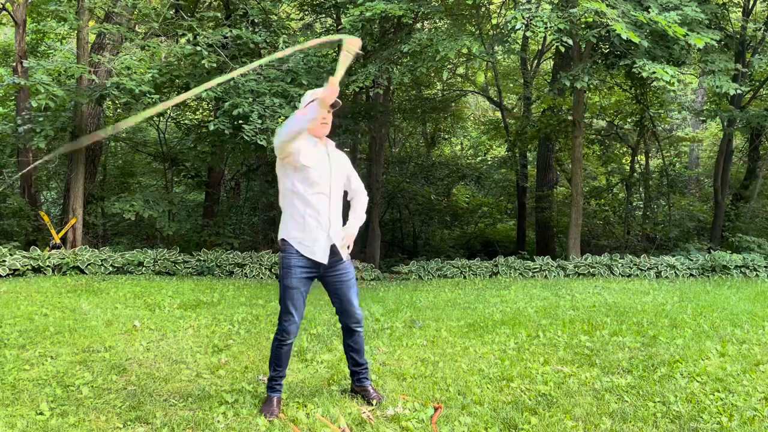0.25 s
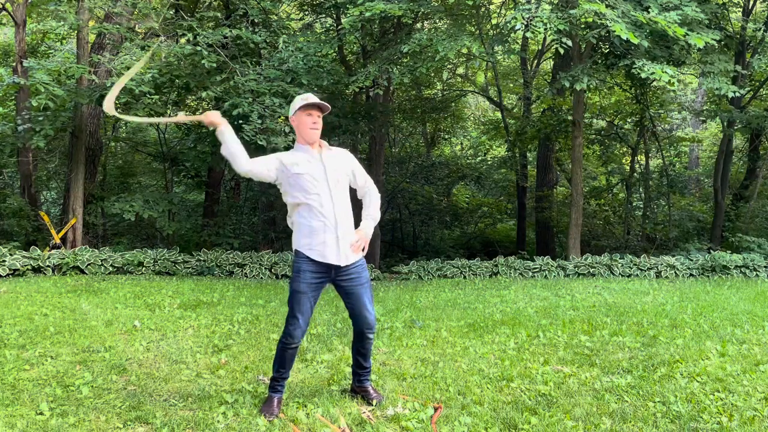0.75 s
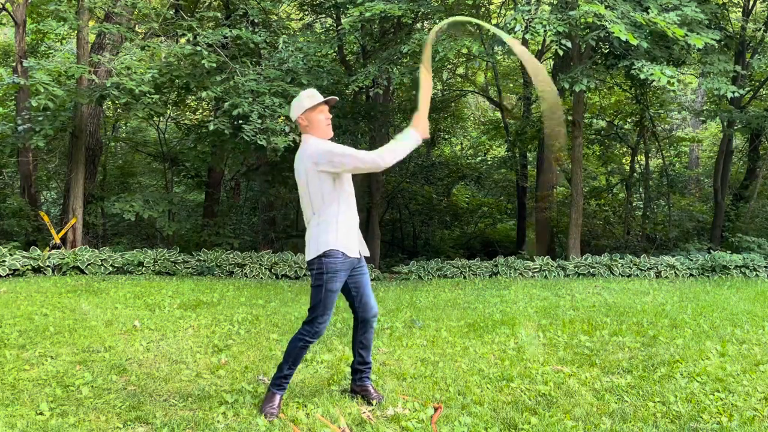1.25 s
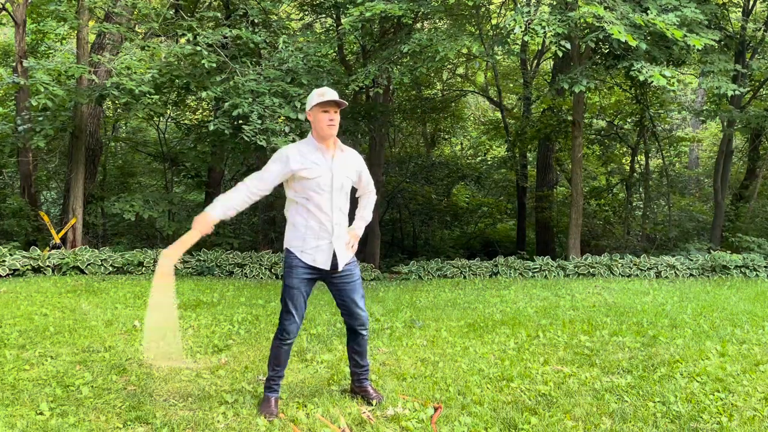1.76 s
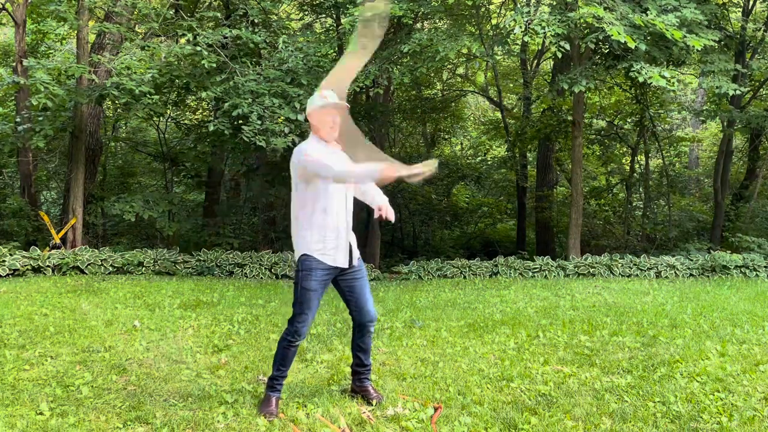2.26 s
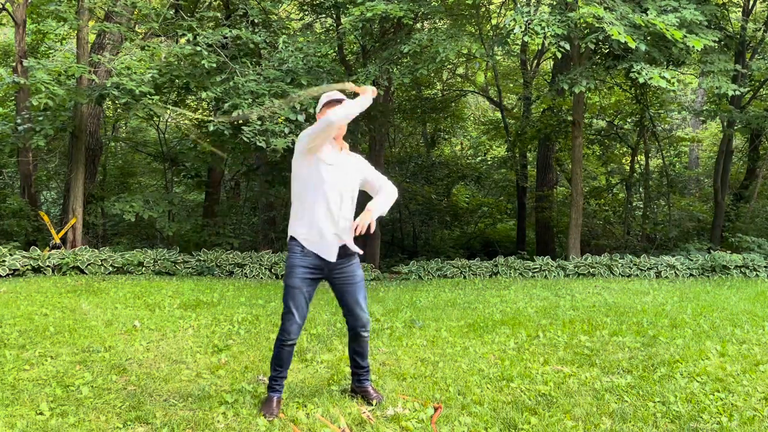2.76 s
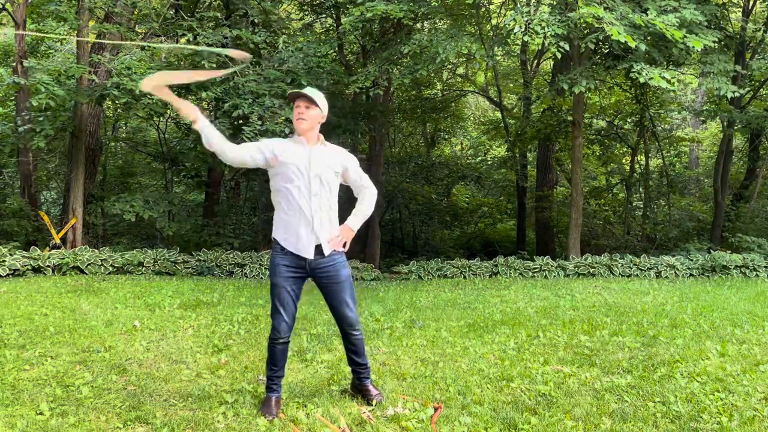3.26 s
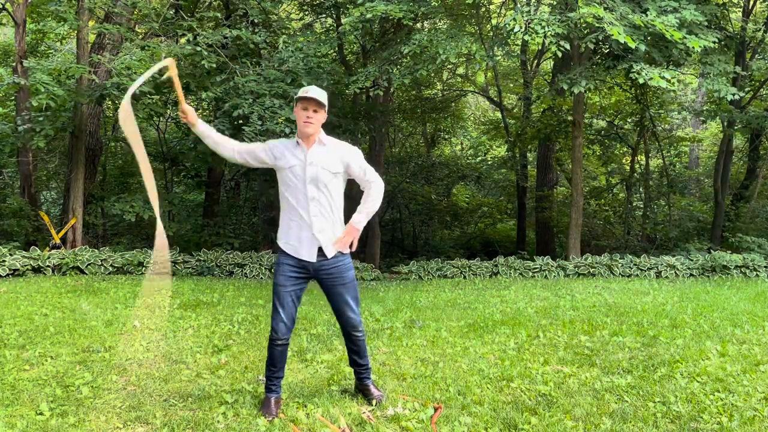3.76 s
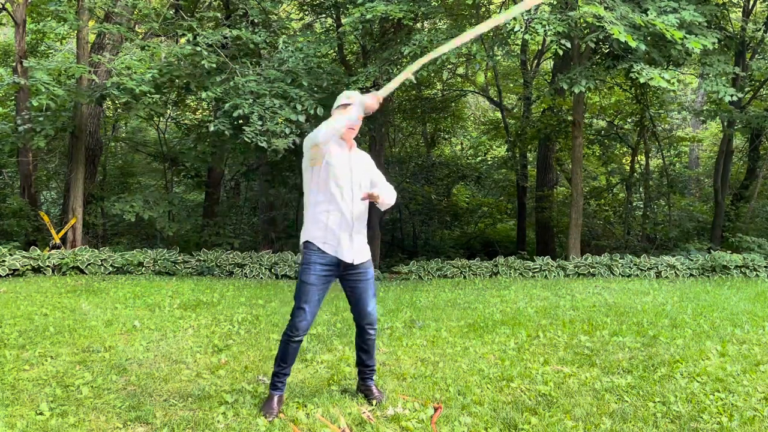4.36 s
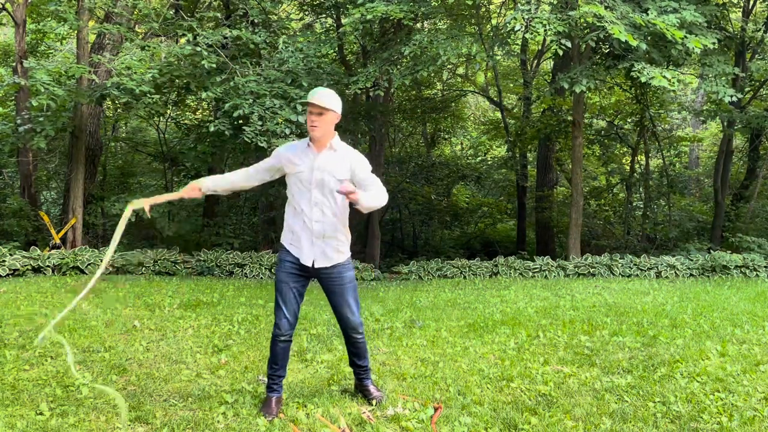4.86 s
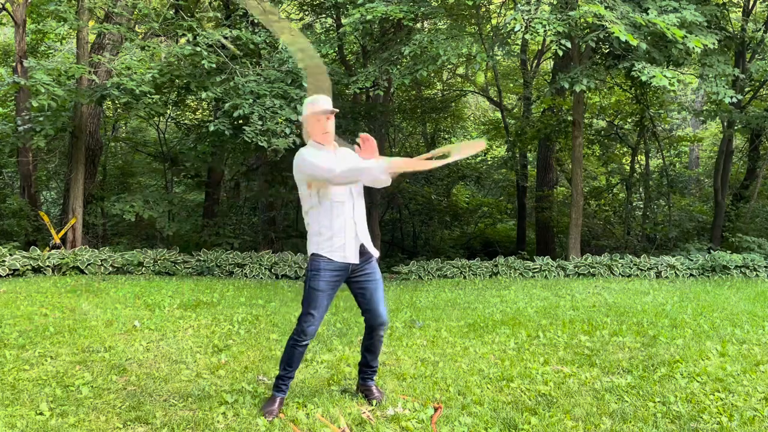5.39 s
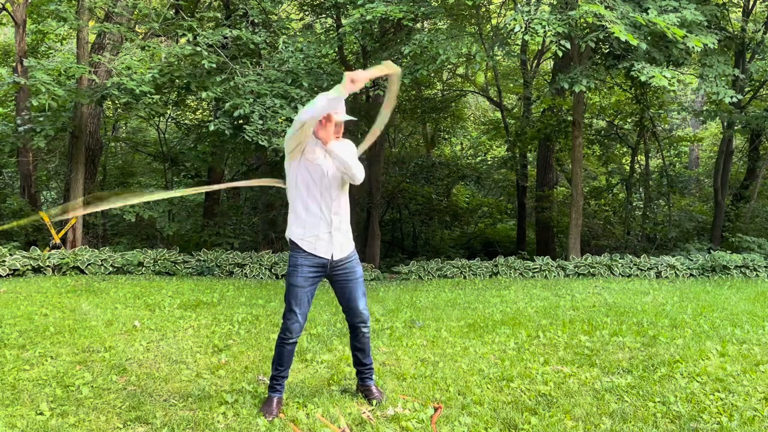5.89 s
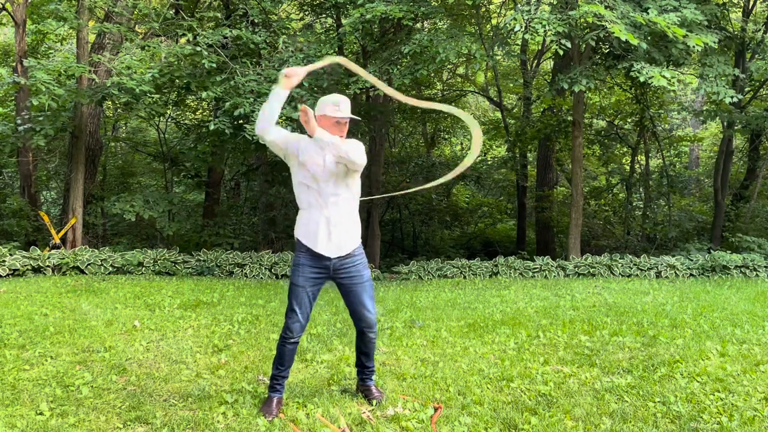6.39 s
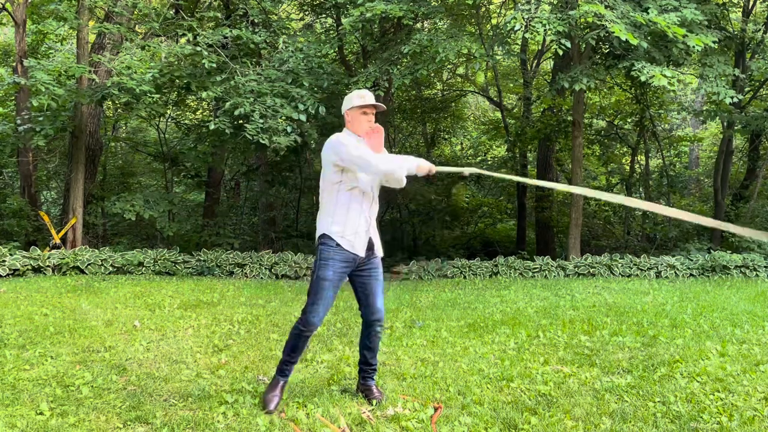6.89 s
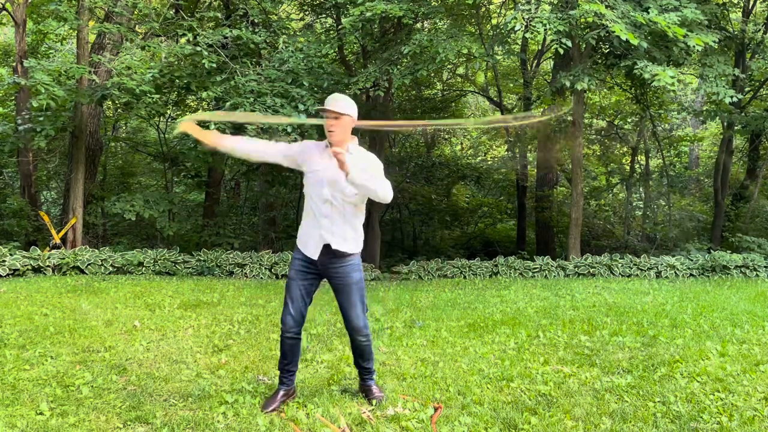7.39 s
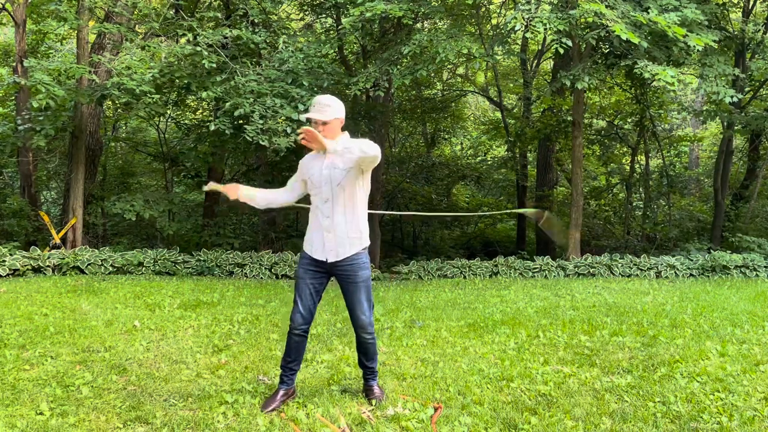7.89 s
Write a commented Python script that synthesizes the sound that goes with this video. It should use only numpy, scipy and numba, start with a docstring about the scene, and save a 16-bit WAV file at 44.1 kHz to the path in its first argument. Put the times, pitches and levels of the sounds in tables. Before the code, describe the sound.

Runs of loud, sharp whip cracks outdoors, some booming deeply, each trailing a brief woodland echo, with airy whooshes before the last double crack.

```python
"""A lawn at the edge of a wood: a long whip is cracked in runs, a few metres from a pocket recorder.
Each crack is a short pressure pulse with a wider rebound, and the hardest boom and leave a low rumble.
Noise bursts stand around the cracks, and swells of hiss bring the wood's echo. Between cracks the thong
swishes and whistles, as moving bands of noise, over a faint hum and a low hum whose level wanders.
The recorder delays the lows behind the highs, holds the peaks and cuts the top."""
import sys
import numpy as np
from scipy import signal
from scipy.fft import rfft, irfft, next_fast_len
from scipy.io import wavfile
from numba import njit

SR = 44100
rng = np.random.default_rng(int(sys.argv[2]) if len(sys.argv) > 2 else 0)


def materialize(psi):
    """Save the field psi as 16-bit PCM at rate SR to the path in sys.argv[1].

    A 1-D psi becomes a single channel; in a 2-D psi each row is a channel.
    """
    bounded = np.clip(np.atleast_2d(psi).T, -1, 1)
    quanta = np.round(bounded * 32767).astype(np.int16)
    wavfile.write(sys.argv[1], SR, quanta)


N = 358974   # length in samples, about 8.1 s

# Sharp cracks, and two weak duller slaps after them (at 1.844 and 3.8232 s). Each row: time in seconds,
# pulse height in dB before the rebound, width at half height in ms, sign (1 or -1), left-right
# difference in dB before the width lessens it, rebound as a share of the pulse's area (0 to 1),
# bright front in dB (relative).
CRACKS = [(0.4372, -3.5, 0.37, 1, -4, 1, -19), (0.442, -10.5, 0.45, 1, -4, 0.75, -26.5),
          (0.445, -15, 0.31, 1, -9, 1, -24), (0.798, -3.5, 0.18, 1, 4.5, 0.95, -36),
          (0.802, -18.5, 0.54, 1, 1, 1, -31), (1.093, -4.5, 0.42, -1, -6, 0.86, -11.5),
          (1.4233, -12, 0.21, 1, -5.5, 0.36, -28), (1.7144, -12.5, 0.48, -1, 0.5, 0.7, -37),
          (1.73, 2, 0.36, -1, 1.8, 0.98, -16.5), (1.844, -15.5, 0.3, 1, 6, 1, -56),
          (3.8232, -24.5, 0.39, -1, 4, 1, -61), (2.3629, 5, 1.06, 1, 3, 0.2, -19),
          (3.0291, -7, 0.41, -1, 3, 0.9, -35), (3.0471, 3, 0.29, -1, -5, 1, -25.5),
          (3.0509, -9.5, 0.59, -1, 2, 0.8, -20), (3.3778, -11, 0.48, 1, 1.5, 1, -29),
          (3.3811, -8, 0.25, 1, 1, 0.9, -63), (3.675, -11.5, 0.54, -1, -2, 1, -26),
          (3.6791, -11.5, 0.2, -1, -1, 0, -46), (4.0117, 8, 0.79, 1, 2, 0, -27),
          (4.8017, 5.5, 1.15, 1, 3, 1, -16), (5.4512, 5, 1.05, 1, 4, 1, -26.5),
          (7.405, 1.1, 0.38, -1, -3.5, 0.96, -25), (7.4083, -2.5, 0.33, -1, -9, 0.97, -19.5)]


def from_db(db):
    """Turn decibels into a gain."""
    return 10 ** (np.asarray(db) / 20)


def rms_one(x):
    """Scale to an rms (average strength) of 1."""
    return x / np.sqrt(np.mean(x ** 2) + 1e-20)


def panned(x, pan_db):
    """Make left and right from a level difference; positive is louder on the left."""
    return np.array([x * from_db(pan_db / 2), x * from_db(-pan_db / 2)])


def two_ports(mid, side):
    """Add the side signal at the left port and subtract it at the right, so the two differ."""
    return np.array([mid + side, mid - side])


def coloured(spectrum, grain=1.):
    """Noise with the given spectrum and rms 1; the grain shapes its level before the colour."""
    size = next_fast_len(N)
    hz = np.maximum(np.arange(size // 2 + 1) * SR / size, 1)
    point_hz, point_db = np.array(spectrum).T
    gain = from_db(np.interp(np.log(hz), np.log(point_hz), point_db))
    white = rng.standard_normal(N) * grain
    return rms_one(irfft(rfft(white, size) * gain, size)[:N])


def flicker(rate_hz):
    """Random wander with rms 1: white noise smoothed twice, so little is left above the rate."""
    r = np.exp(-2 * np.pi * rate_hz / SR)
    white = rng.standard_normal(N + SR)
    return rms_one(signal.lfilter([1], [1, -2 * r, r * r], white)[SR:])   # first second: settling


@njit
def sweep(x, hz, width, rate):
    """Pass x through a resonance whose centre can move; width is a share of the centre."""
    out = np.zeros_like(x)
    for i in range(2, len(x)):
        r = np.exp(-np.pi * width * hz[i] / rate)
        drive = np.sqrt((1 - r * r) / 2) * (x[i] - x[i - 2])
        out[i] = drive + 2 * r * np.cos(2 * np.pi * hz[i] / rate) * out[i - 1] - r * r * out[i - 2]
    return out


def swells(s, level_db, rise_s, fall_db_per_s):
    """Each swell rises to its top, then fades at a steady rate; their powers add."""
    t = np.arange(0, N / SR + .002, .001)   # a coarse clock is enough
    after = t - np.asarray(s)[:, None]
    rise = np.clip(1 + after / np.maximum(rise_s, 1e-3)[..., None], 0, 1) ** 2
    fall_db = fall_db_per_s * np.maximum(after, 0)
    gain = rise * from_db(np.asarray(level_db)[:, None] - fall_db)
    total = np.sqrt((gain ** 2).sum(axis=0))
    return np.interp(np.arange(N) / SR, t, total)


def port_noise():
    """Grainy noise from all around at the two ports, split into body and treble."""
    # Colour of the sum of the ports. Each row: frequency in Hz, relative level in dB.
    mid_colour = [(88, -57), (150, -16), (528, -10.5), (606, -10.5), (916, -9), (3160, -1.5), (7220, -7),
                  (7810, -35.5), (8290, -79), (9150, -14), (11400, -14), (13300, -23), (14400, -57.5),
                  (16500, -90)]
    # Colour of their difference. Each row: frequency in Hz, relative level in dB.
    side_colour = [(88, -52), (150, -25.5), (560, -12), (643, -7.5), (1690, -3.5), (2760, -4), (6050, -7),
                   (7810, -7.5), (10300, -13.5), (11400, -75), (12800, -25), (14700, -16.5), (15600, -27.5),
                   (16500, -46)]
    side_db = -2
    grain_db, grain_hz = 1.5, 300   # depth and rate of the grain
    treble_from_hz, treble_lift_db = 3750, 13.5
    grain = from_db(grain_db * flicker(grain_hz))
    mid = coloured(mid_colour, grain)
    side = from_db(side_db) * coloured(side_colour, grain)
    ports = two_ports(mid, side)
    lowpass = signal.butter(2, treble_from_hz, fs=SR, output="sos")
    body = signal.sosfiltfilt(lowpass, ports)
    return body, from_db(treble_lift_db) * (ports - body)


def hum(level_db=-68.5, side_db=-8):
    """Distant traffic and leaves: steady noise, mostly low and nearly alike at both ports."""
    # Colour of the hum. Each row: frequency in Hz, relative level in dB.
    hum_colour = [(15, -44), (25, -20), (43, -4), (76, -17), (108, -4), (161, -25), (335, -18),
                  (575, -22.5), (641, -25), (2760, -37), (7920, -60), (10400, -46.5), (16000, -65.5)]
    mid = coloured(hum_colour)
    side = from_db(side_db) * coloured(hum_colour)
    return from_db(level_db) * two_ports(mid, side)


def wandering_hum(centre_hz=101.8, width=0.2):
    """A low hum near 100 Hz whose level wanders: noise in a narrow band, alike at both ports."""
    # Loudness over time. Each row: time in seconds, level in dB.
    hum_levels = [(0, -66), (.5, -62.5), (1.7, -67), (2.0, -62), (3.0, -63), (3.3, -70.5), (4.1, -67),
                  (4.5, -65), (5.3, -71.5), (6.0, -68.5), (8.14, -71.5)]
    s, points_db = np.transpose(hum_levels)
    level_db = np.interp(np.arange(N) / SR, s, points_db)
    band = sweep(flicker(420), np.full(N, centre_hz), width, float(SR))
    return from_db(level_db) * rms_one(band)


def rumble(centre_hz=44.4, width=0.09, side_db=-9, edge_s=.02):
    """Far low echoes of the booms: narrow low noise, a quick first roll over a longer one."""
    # Rolls after the booms. Each row: time in seconds, first roll in dB, long roll in dB.
    rolls = [(2.44, -31.5, -44.5), (4.08, -63, -48), (4.87, -43.5, -38.5), (5.59, -46, -40)]
    first_fall_db_per_s, long_fall_db_per_s, roll_s = 192, 54, 0.33
    s, first_db, long_db = np.transpose(rolls)
    t = np.arange(N) / SR
    # each roll fades out fully after roll_s
    lasting = sum(np.clip((at + roll_s - t) / edge_s, 0, 1) * (t > at - .1) for at in s)
    first = swells(s, first_db, edge_s, first_fall_db_per_s)
    long = swells(s, long_db, edge_s, long_fall_db_per_s)
    level = lasting * np.hypot(first, long)
    centre = np.full(N, centre_hz)
    mid, side = (rms_one(sweep(flicker(76), centre, width, float(SR))) for _ in range(2))
    return level * two_ports(mid, from_db(side_db) * side)


def hiss_swells():
    """Noise that swells and fades, its treble faster than its body, as air takes the highs first."""
    # Swells of hiss: the wood's echo after cracks, and the thong's hiss near 6.6 and 6.8 s. Each row:
    # time of the top in seconds, level in dB, rise in seconds, treble in dB relative to that level.
    hiss_tops = [(0.0, -55, .01, -43), (0.447, -23, 0.026, -10), (0.52, -34, 0.067, -22),
                 (0.8, -29, 0.015, -11), (1.1, -43, .02, -12.5), (1.425, -32.5, 0.02, -6),
                 (1.753, -32.5, 0.04, -4.5), (1.798, -39, 0.098, -9.5), (2.354, -37, 0.022, -12),
                 (2.63, -42, 0.39, -19.5), (3.055, -21.5, 0.018, -12.5), (3.381, -31, 0.01, -3.5),
                 (3.471, -33, 0.25, -29), (3.681, -30.5, .008, -7.5), (4.015, -34, 0.024, -10.5),
                 (4.2, -35.5, 0.29, -21.5), (4.8, -26, 0.027, -15.5), (5.0, -38.5, 0.095, -20.5),
                 (5.444, -33, 0.034, -16.5), (5.647, -44, 0.14, -19.5), (6.6, -59, 0.019, -16.5),
                 (6.78, -59.5, .1, -9), (7.41, -24, 0.036, -14.5), (7.55, -39.5, .1, -19.5)]
    fall_db_per_s, air_db_per_s = 62.5, 46.5   # fading of all; extra fading of the treble
    s, level_db, rise_s, treble_db = np.transpose(hiss_tops)
    body, treble = port_noise()
    body_level = swells(s, level_db, rise_s, fall_db_per_s)
    treble_level = swells(s, level_db + treble_db, rise_s, fall_db_per_s + air_db_per_s)
    return body_level * body + treble_level * treble


def noise_bursts(colour_db=-2.0, width=0.25, rise_s=0.0024):
    """Short noise bursts that start fast and fade steadily, each with a favoured band."""
    # Short bursts of noise just before, at and after the cracks, each with a favoured band. Each row:
    # start in seconds, level in dB before the burst offset below, time to fade by 60 dB in seconds,
    # left-right difference in dB, strongest frequency in Hz.
    bursts = [(0.3944, -34, 0.24, 3, 1260), (0.4334, -17.5, 0.015, 7.5, 1290),
              (0.4484, -14, 0.04, 12, 4460), (0.4854, -8.5, 0.24, -1.5, 2030), (0.589, -20, 0.056, 6, 2780),
              (0.7964, -14.5, 0.024, 17, 1530), (0.8435, -12.5, 0.091, 0.5, 1760),
              (1.0821, -9, 0.026, 3, 5070), (1.0902, -9.5, 0.072, 1, 3280), (1.149, -22, 0.043, -5, 1190),
              (1.422, -9, 0.053, 2.5, 5300), (1.4574, -16, 0.093, 2.5, 2720),
              (1.713, -19.5, 0.069, 3.5, 1660), (1.732, -13, 0.083, -7, 1260),
              (1.737, -5, 0.048, 10.5, 4530), (1.7464, -12.5, 0.13, 1.5, 4620), (1.843, -28, 0.068, 0, 560),
              (2.346, -17, 0.11, -8, 1890), (2.3605, -4.5, 0.035, 5, 5520), (2.3714, -15, 0.067, -4, 1300),
              (3.028, -16.5, 0.084, 1, 5670), (3.05, -17, 0.067, -9, 1200), (3.054, -5, 0.025, 10, 4450),
              (3.0875, -6.5, 0.14, -1, 1880), (3.103, -4.5, 0.045, -0.5, 2880),
              (3.199, -15.5, 0.029, 13, 2930), (3.3764, -13.5, 0.072, -1, 5120),
              (3.4226, -13.5, 0.19, 1.5, 2240), (3.672, -13.5, 0.047, 0, 2090),
              (3.7344, -14, 0.053, -1, 2180), (4.0098, -4.5, 0.022, 7.5, 1330),
              (4.062, -17.5, 0.1, 1, 2570), (4.2044, -26, 0.1, 4, 1970), (4.787, -25, 0.057, 0, 2400),
              (4.799, 0, 0.021, 1.5, 2390), (4.8486, -9, 0.1, 0, 1900), (4.8715, -12.5, 0.054, -10.5, 1920),
              (5.4398, -8.5, 0.069, -6, 2020), (5.448, -12, 0.074, 13.5, 1880),
              (5.511, -17, 0.024, -20.5, 2678), (6.58, -40.5, 0.083, -1, 3500),
              (6.79, -25.5, 0.063, 2, 2200), (7.387, -16.5, 0.11, 1, 6030), (7.4023, -11.5, 0.064, 2, 1210),
              (7.4076, -5, 0.051, 0.5, 2480), (7.453, -8, 0.14, -0.5, 2370), (8.0, -37, 0.11, 2, 3000)]
    burst_offset_db = -10
    # treble is strongest next to a crack, and lost with the time to the nearest one
    brightest_db, dulling_db_per_s, dullest_db = -12.5, 220, -39
    out, t = np.zeros((2, N)), np.arange(SR // 8) / SR
    body, treble = port_noise()
    for s, peak_db, t60, pan_db, hz in bursts:
        distance_s = min(abs(s - crack[0]) for crack in CRACKS)
        treble_db = max(brightest_db - dulling_db_per_s * distance_s, dullest_db)
        start = round(s * SR)
        part = slice(start, start + len(t))
        centre = np.full(len(t), float(hz))
        band = np.array([sweep(port, centre, width, float(SR)) for port in body[:, part]])
        favoured = from_db(colour_db) * rms_one(band)
        colour = body[:, part] + favoured + from_db(treble_db) * treble[:, part]
        shape = (1 - np.exp(-t / rise_s)) * from_db(peak_db + burst_offset_db - 60 * t / t60)
        out[:, part] += panned(shape, pan_db) * colour
    return out


def whistles(width=0.17):
    """Short whistles of the thong and its tip: a narrow gliding noise band swells and dies."""
    # Each row: start in seconds, level in dB, starting pitch in Hz, glide in octaves per second.
    calls = [(.335, -54, 465, 2), (0.392, -46, 1080, -3), (0.401, -38, 4340, -32), (0.41, -42, 560, 42),
             (1.049, -37.5, 301, 45), (2.3, -49, 223, 17), (2.69, -57, 398, 6), (5.37, -53, 230, 15.5),
             (5.88, -54, 1050, 0), (6.577, -46, 3770, -5.5), (6.581, -54, 1610, -3), (6.623, -69, 557, 10),
             (6.68, -46.5, 3900, -6.5), (6.689, -52, 1260, 5), (6.695, -47, 724, 0), (6.705, -48, 428, 1),
             (6.72, -41, 700, 1), (6.74, -50, 430, -1), (6.75, -42, 830, 3.5), (6.786, -39.5, 1850, -25),
             (6.796, -52, 3020, -3), (6.803, -46, 620, 3), (6.81, -45, 1345, -1), (6.83, -52.5, 640, 2),
             (6.889, -57, 407, -13), (6.995, -66.5, 1560, 17), (7.002, -58, 903, 9.5),
             (7.007, -62.5, 2420, -5.5), (8.001, -51, 3410, -3), (8.005, -49.5, 1340, 1)]
    base_s, cycles = .021, 9.5   # a whistle lasts this long plus so many cycles
    out, t = np.zeros(N), np.arange(SR // 10) / SR
    for s, level_db, hz, glide in calls:
        length = base_s + cycles / hz
        pitch = hz * 2. ** (glide * np.minimum(t, length))
        once = sweep(rng.standard_normal(len(t)), pitch, width, float(SR))
        tone = rms_one(sweep(once, pitch, width, float(SR)))
        shape = np.sin(np.pi * np.minimum(t / length, 1)) ** 2
        out[round(s * SR):][:len(t)] += tone * from_db(level_db) * shape
    return out


def swish(width=0.28, side_gain=.4):
    """Vortices shed by the thong: noise in bands whose centre glides from stroke to stroke."""
    # Strokes through the air. Each row: time of the peak in seconds, level in dB, centre in Hz.
    strokes = [(0.0, -59.5, 610), (0.39, -51.5, 510), (1.13, -44, 576), (1.4, -57.5, 400), (1.9, -71, 620),
               (2.24, -62, 302), (2.33, -55, 265), (2.9, -57, 240), (3.01, -51, 380), (4.3, -57.5, 890),
               (4.77, -53, 380), (5.1, -56.5, 1000), (5.42, -54.5, 291), (5.93, -60.5, 998),
               (6.72, -50, 600), (6.819, -45.5, 634), (6.91, -55, 400), (7.05, -68.5, 599),
               (7.23, -66, 281.4), (7.36, -55.5, 347), (7.6, -61.5, 983), (7.96, -57, 419),
               (8.03, -54.5, 944)]
    # Thinner parts of the thong sound higher. Each row: multiple of the centre, level in dB.
    thong_parts = [(1, -3.5), (1.9, -8.5), (3.802, -22.5)]
    rise_db_per_s, fall_db_per_s, idle_db = 114.5, 108, -75   # the last: the idle thong
    s, top_db, centre_hz = np.transpose(strokes)
    t = np.arange(N) / SR
    hz = np.interp(t, s, centre_hz)
    level_db = np.full(N, float(idle_db))
    for at, db in zip(s, top_db):
        drop_db = np.maximum(rise_db_per_s * (at - t), fall_db_per_s * (t - at))
        level_db = np.maximum(level_db, db - drop_db)   # the loudest stroke wins
    mid, side = np.zeros((2, N))
    for multiple, part_db in thong_parts:
        for total in (mid, side):
            band = sweep(rng.standard_normal(N), hz * multiple, width, float(SR))
            total += from_db(part_db) * band
    return from_db(level_db) * two_ports(mid, side_gain * side)


def shocks(rebound_widths=8.3, front_s=0.00027):
    """Cracks, slaps and thumps: a pointed pulse on a wider opposite rebound; all but thumps add a front."""
    # Dull thumps before and after the cracks. Each row: time in seconds, pulse height in dB before the
    # rebound, width at half height in ms, sign (1 or -1), left-right difference in dB before the width
    # lessens it.
    thumps = [(2.0684, -42.6, 0.7, 1, 8), (2.3517, -11, 0.69, 1, 4.5), (2.3585, -2, 0.33, -1, -17.5),
              (2.3708, -3, 4, 1, 8), (2.3864, -0.5, 12, -1, -3), (2.4028, -12, 3.8, -1, 3.5),
              (2.4288, -20, 8, 1, 0), (2.5084, -27.5, 1.35, -1, 5), (3.996, -14, 2.6, 1, 5),
              (4.1555, -34, 1.5, -1, -0.5), (4.206, -28, 0.47, -1, -3), (4.7876, -13.5, 2.7, 1, -1),
              (4.8052, -6.5, 3.6, 1, -1.5), (4.8199, -5.5, 2.9, -1, 5), (4.861, -13.5, 4.2, 1, 6.5),
              (4.9756, -29.5, 1.8, -1, 3), (5.235, -42, 1.06, 1, 1), (5.44, -6.5, 10.5, -1, 9),
              (5.4756, -7.5, 8.1, 1, 0.5), (5.5277, -11.5, 5.2, 1, 16), (5.543, -8.5, 12.7, -1, -5),
              (5.5709, -15.5, 1.4, -1, 6), (6.7798, -32, 0.79, -1, 3), (7.712, -49, 1.84, 1, 0),
              (7.906, -42, 0.62, 1, 0), (8.049, -41.5, 0.77, 1, 2)]
    thump_rebound = .12   # share of the pulse's area
    half = 2000           # samples on each side of a pulse
    out, t = np.zeros((2, N)), np.arange(-half, half) / SR
    bright = signal.butter(2, [7000, 13500], "band", fs=SR, output="sos")
    rows = CRACKS + [(*row, thump_rebound, -np.inf) for row in thumps]   # -inf dB: no front
    for s, peak_db, width_ms, polarity, pan_db, rebound, front_db in rows:
        at = round(s * SR)
        x = np.abs(t + at / SR - s) / (width_ms / 2000)   # distance in half widths
        pulse = 2. ** -x ** 1.38
        dip = 2. ** -(x / rebound_widths) ** 2 * np.hanning(len(t))
        pulse = pulse - np.clip(rebound, 0, 1) * dip * pulse.sum() / dip.sum()
        pulse = np.sign(polarity) * from_db(peak_db) * pulse
        # long waves bend round the recorder and reach both ports alike
        side_db = pan_db / (1 + width_ms / 3)
        # the noise of the front differs at the two ports
        hiss = 4 * signal.sosfilt(bright, rng.standard_normal((2, len(t))))
        front = from_db(front_db) * np.exp(-np.abs(t) / front_s) * hiss
        out[:, at - half:at + half] += panned(pulse, side_db) + front
    return out


def scene():
    """Everything that reaches the two ports."""
    background = hum() + wandering_hum() + rumble()
    noises = hiss_swells() + noise_bursts()
    return background + noises + whistles() + swish() + shocks()


def record(dry):
    """Bass cut and crossovers delay the lows, so a pulse becomes a falling chirp; peaks are held."""
    # Where the recorder splits its bands, in Hz.
    crossovers_hz = [82, 244, 508]
    bass_cut_hz, bass_cut_q, phase_turn_hz = 64, 2.5, 104
    ceiling, top_cut_hz = .93, 16600
    w = 2 * np.pi * bass_cut_hz
    x = signal.lfilter(*signal.bilinear([1, 0, 0], [1, w / bass_cut_q, w * w], SR), dry)
    w = 2 * np.pi * phase_turn_hz   # next: turns the phase only
    x = signal.lfilter(*signal.bilinear([1, -w], [1, w], SR), x)
    for hz in crossovers_hz:
        poles = signal.butter(2, hz, fs=SR)[1]
        x = signal.lfilter(poles[::-1], poles, x)   # all-pass: the sum of a crossover's two bands
    x = x / (1 + (x / ceiling) ** 6) ** (1 / 6)     # soft ceiling
    return signal.sosfilt(signal.cheby2(12, 70, top_cut_hz, fs=SR, output="sos"), x)


dry = scene()
out = record(dry)
materialize(out)
```